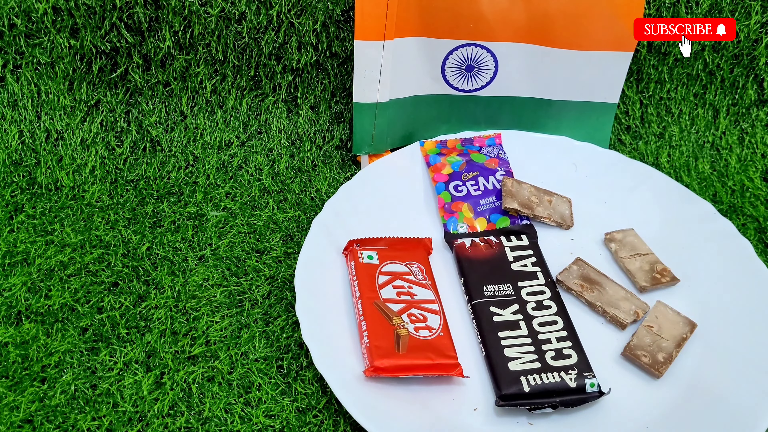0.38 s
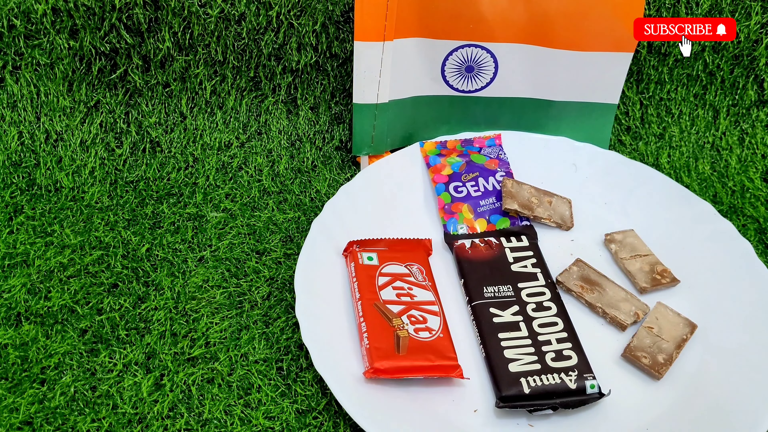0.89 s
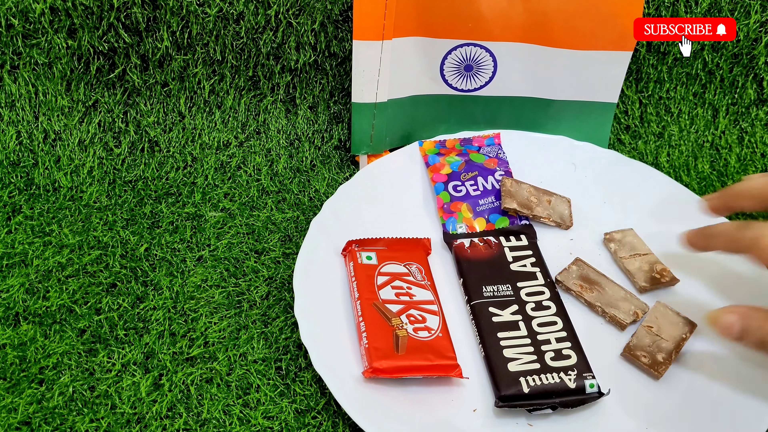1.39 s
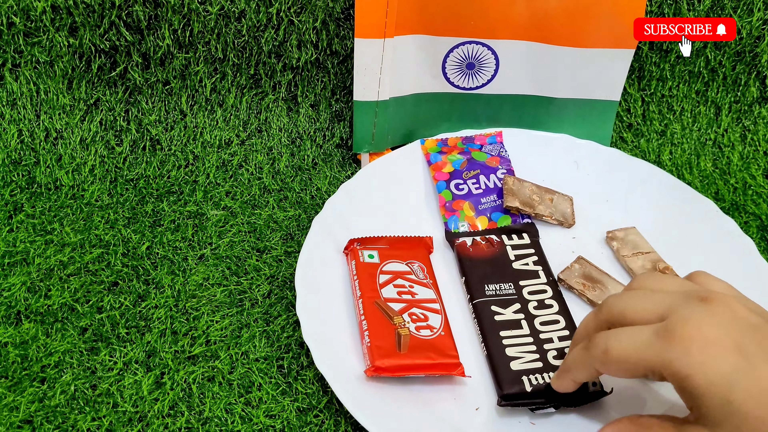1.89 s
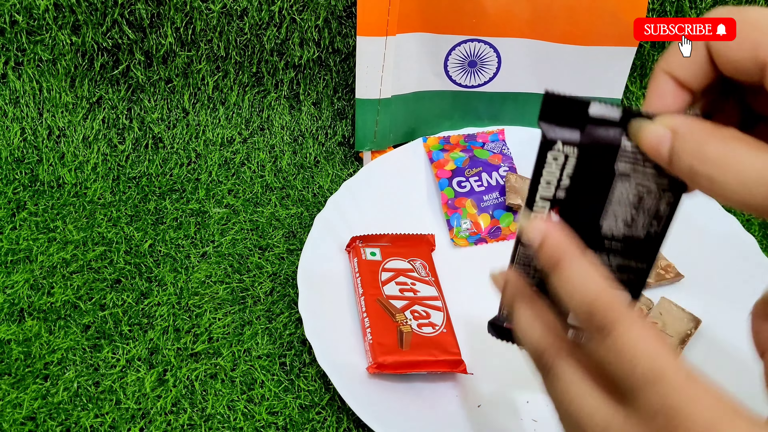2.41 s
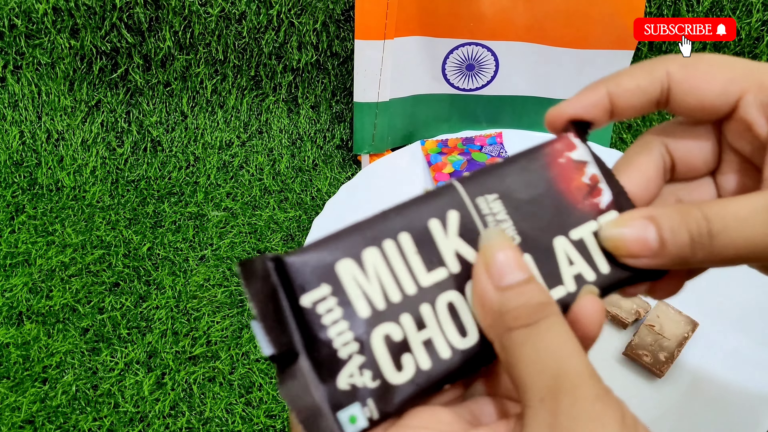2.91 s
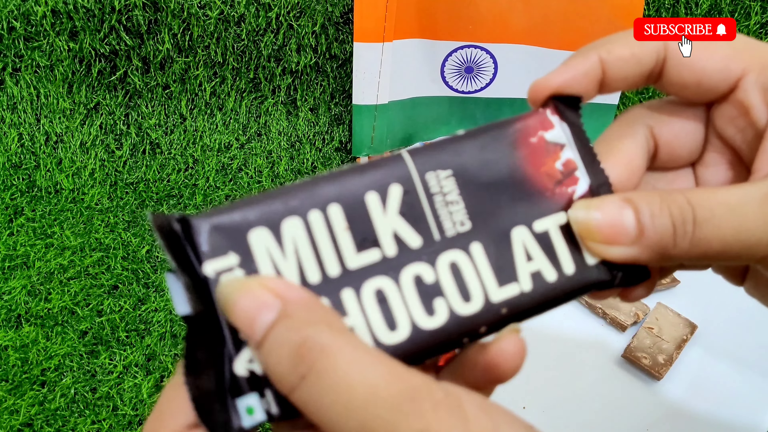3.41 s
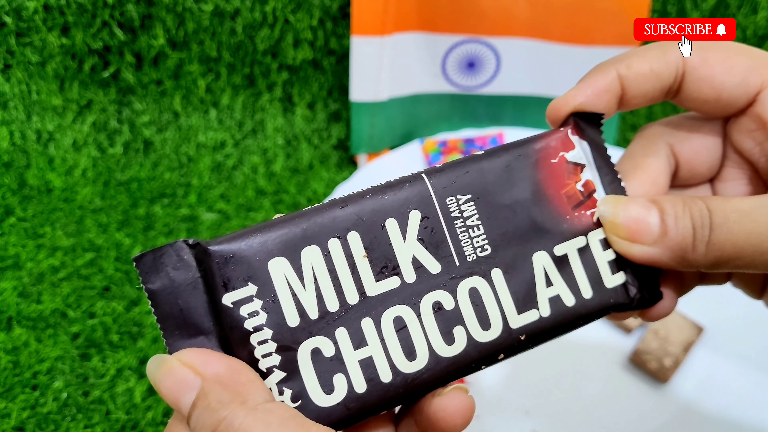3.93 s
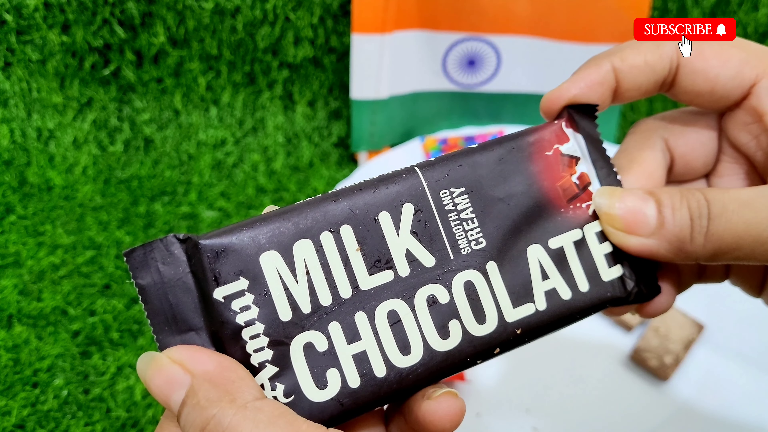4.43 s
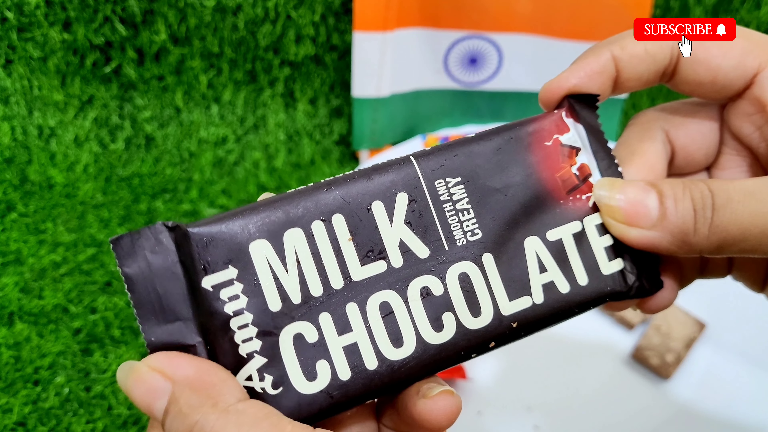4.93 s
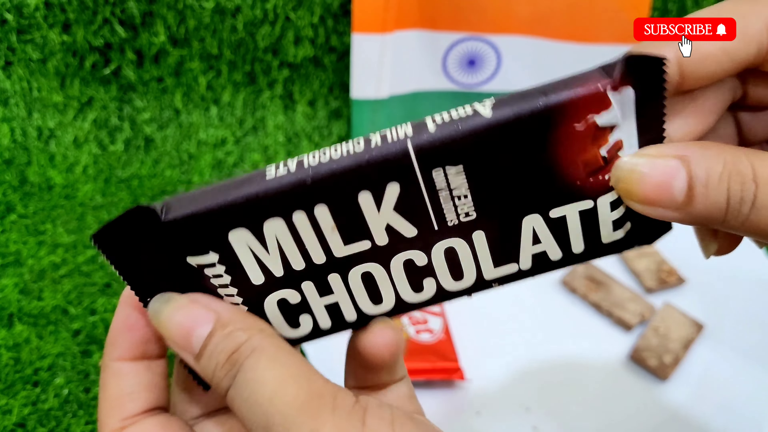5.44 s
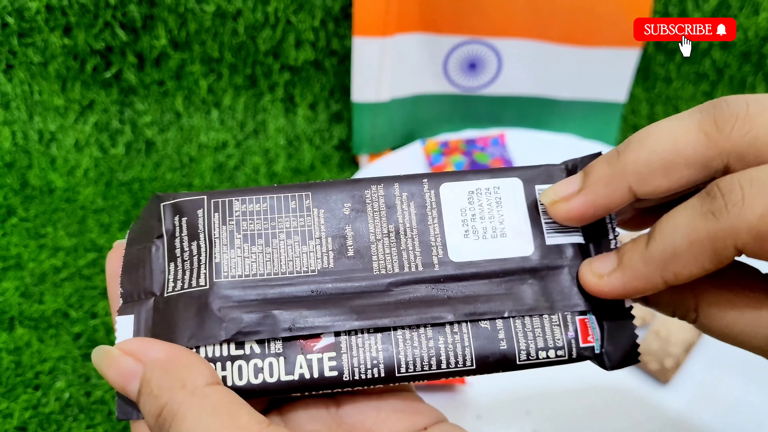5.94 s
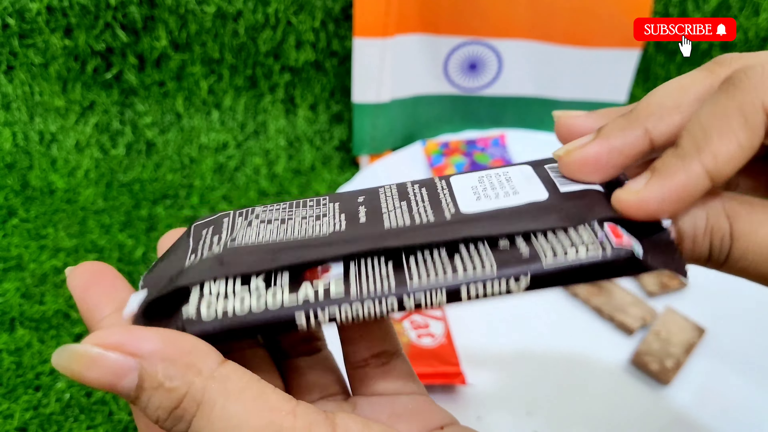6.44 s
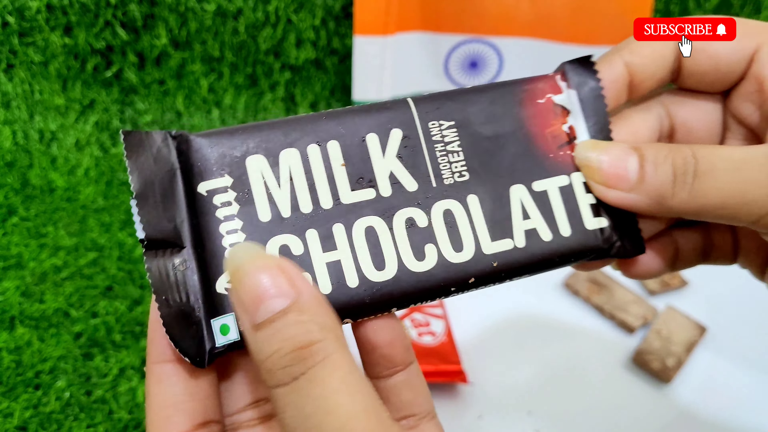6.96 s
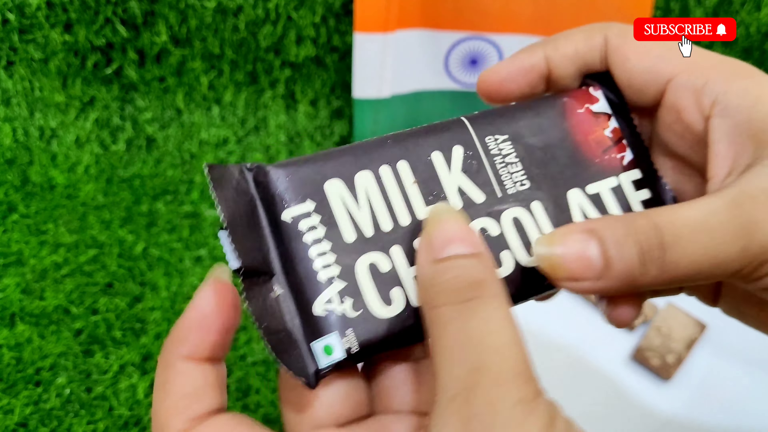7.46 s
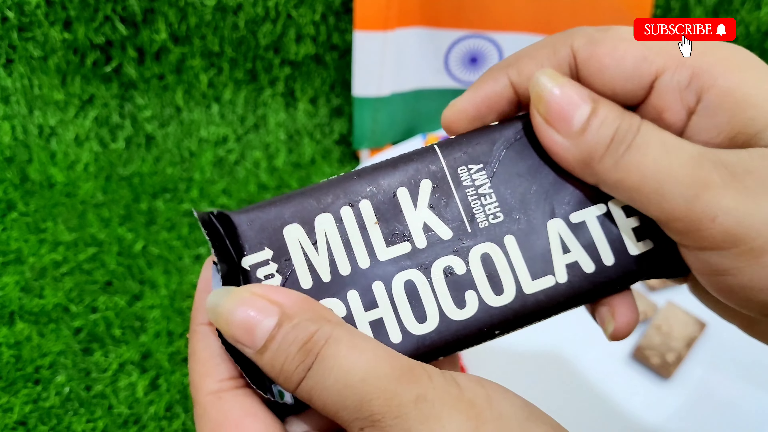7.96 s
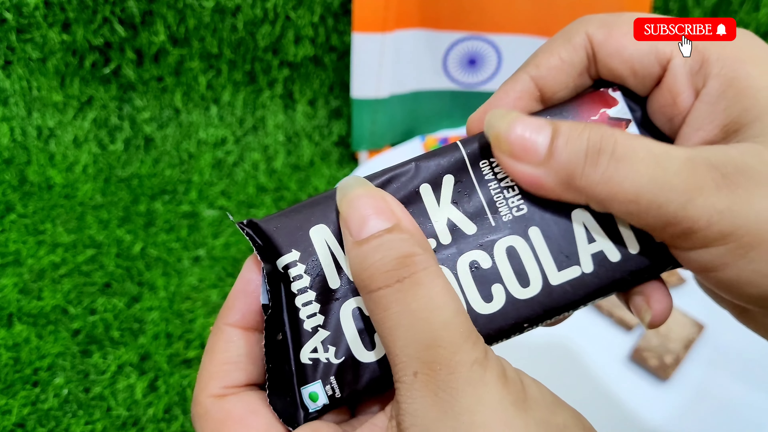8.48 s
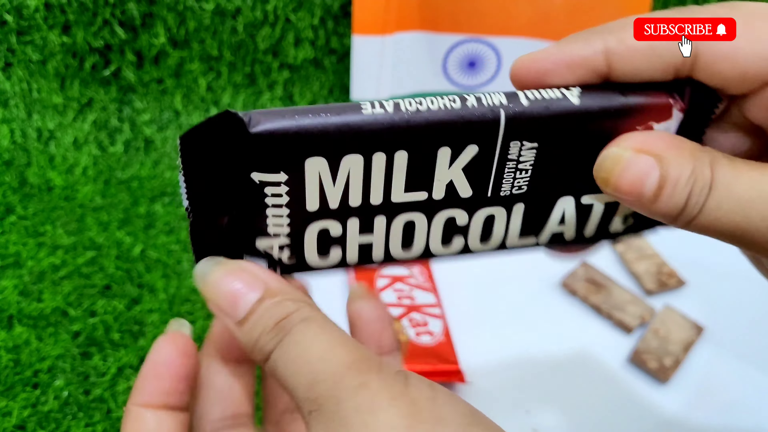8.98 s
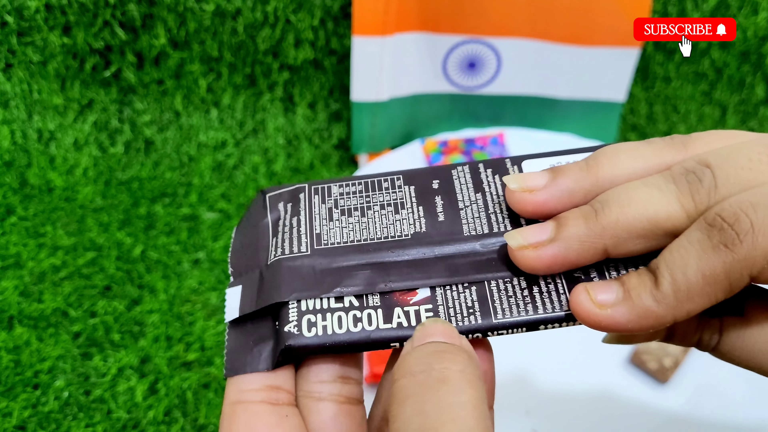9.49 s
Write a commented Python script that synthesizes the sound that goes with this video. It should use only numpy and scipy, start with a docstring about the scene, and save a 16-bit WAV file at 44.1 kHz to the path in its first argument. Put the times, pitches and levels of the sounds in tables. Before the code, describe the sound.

Close stereo pickup in a small room, with a faint uneven low rumble, soft hum, barely audible thin tone and hiss throughout. At 0 s a tight cluster of loud, bright film crackles bursts out, weakening by 0.7 s into duller crinkles. From about 1.1 to 1.8 s it is nearly silent. Around 1.8 s fingers touch the wrapper, and from 2.1 to 4 s crisp snaps and fine rustling come in quick irregular flurries, with a strong snap near 3.5 s. About 4.2 to 5 s is quiet apart from a soft bump near 4.9 s. A sharp crack at 5.4 s starts lighter, scattered crinkles, with clearer snaps at 6.3, 6.7 and 7 s. From 7.4 to 8.9 s squeezing becomes dense and forceful, peaking near 8.4 and 8.85 s, then thins to sparse crackles and a dull knock around 9.1 s, ending near 9.6 s.

```python
"""Chocolate bar in a crackling wrapper

Hands lift and turn a chocolate bar in its plastic wrapper, close to a two-port microphone in a small room.
Creases in the film snap over: each is shaped noise with a short ring, a treble crack and a low pop.
Tiny noise ticks and a steady noise rub fill the gaps, louder each time the fingers squeeze.
Below lie a rumble that swells and sinks, a hum, a faint tone and hiss, and a few soft bumps from the hands."""
import sys
import numpy as np
from scipy import signal
from scipy.io import wavfile
from scipy.ndimage import uniform_filter1d

SR = 44100
rng = np.random.default_rng(int(sys.argv[2]) if len(sys.argv) > 2 else 0)


def wav_record(signal):
    """Record a signal, one row per channel, as 16-bit PCM in the file named by sys.argv[1]."""
    frames = np.transpose(np.atleast_2d(signal))
    bounded = np.clip(frames, -1, 1)
    # unit amplitude maps onto the largest positive 16-bit level
    quanta = np.round(bounded * 32767).astype(np.int16)
    wavfile.write(sys.argv[1], SR, quanta)


def makeup_ratio(level_db):
    """Linear amplitude ratio for a level in decibels (20 dB per factor of ten)."""
    decades = np.asarray(level_db, float) / 20
    return 10 ** decades


N = 423801  # length in samples


def evened(x):
    """Scales to rms 1."""
    return x / np.sqrt(np.mean(x ** 2) + 1e-20)


def peaked(x):
    """Scales every row to peak 1."""
    return x / abs(x).max(-1, keepdims=True)


def read(points, hz):
    """Reads a table of (pitch, value) at any pitch, on a log-frequency axis."""
    f, value = np.transpose(points)
    return np.interp(np.log(hz + 1), np.log(f + 1), value)


def curve(rows):
    """Joins (time, value) points by straight lines, one value per sample."""
    time_s, value = np.transpose(rows)
    return np.interp(np.arange(N) / SR, time_s, value)


def add(mix, start_s, sound):
    """Mixes a two-port sound in at start_s, trimming what falls outside."""
    start = round(start_s * SR)
    sound = sound[:, max(-start, 0):]
    part = mix[:, max(start, 0):][:, :sound.shape[1]]
    part += sound[:, :part.shape[1]]


def band(x, lo_hz, hi_hz):
    """Band-pass filter that only looks back in time."""
    sos = signal.butter(2, [lo_hz, min(hi_hz, .49 * SR)], "band", fs=SR, output="sos")
    return signal.sosfilt(sos, x)


def colour(x, db_points, share=1):
    """Minimum-phase filter with the given spectrum, its dB values multiplied by share."""
    hz = abs(np.fft.fftfreq(2048, 1 / SR))
    log_gain = share * np.log(makeup_ratio(np.maximum(read(db_points, hz), -100)))
    taps = np.fft.ifft(np.exp(log_gain - 1j * signal.hilbert(log_gain).imag)).real
    return signal.oaconvolve(x, taps[:1024])[:N]


def noise(spectrum, size, patchy_db):
    """Two-port noise from random short-time spectra, with patches of time and pitch that differ in level."""
    # how alike the two ports are: pitch_hz, likeness (1 = the same)
    port_likeness = [(60, 0.95), (500, 0.86), (1500, 0.048), (15000, 0.17)]
    frames, hz = 4 * N // size + 5, np.fft.rfftfreq(size, 1 / SR)
    a, b, c, d, patches = rng.standard_normal((frames, len(hz), 5)).T
    patches = uniform_filter1d(patches, size=8, axis=0)
    patches = evened(uniform_filter1d(patches, size=6, axis=1))
    same = np.clip(read(port_likeness, hz), -1, 1)[:, None]
    left = a + 1j * b
    right = same * left + np.sqrt(1 - same ** 2) * (c + 1j * d)
    z = np.array([left, right])
    z *= makeup_ratio(read(spectrum, hz)[:, None] + patchy_db * patches)
    return evened(signal.istft(z, nperseg=size, noverlap=3 * size // 4)[1][:, :N])


def fading(t, t60, rise):
    """Quick rise, then an exponential fall of 60 dB in t60 seconds."""
    return (1 - np.exp(-t / rise)) * makeup_ratio(-60 * t / t60)


def handling():
    """How hard the film is worked, in dB: every squeeze grips fast, holds and lets go more slowly."""
    # squeezes of the fingers: start_s, rustle_db, hold_s
    squeezes = [(0, -31.5, 0.14), (.24, -53.5, 0.097), (0.44, -35, 0.017), (0.545, -44, 0.15),
                (0.748, -59, 0.083), (0.926, -46.5, 0.04), (1.059, -67, 0.13), (1.25, -74, 0.14),
                (1.663, -72, 0.04), (1.753, -67.5, 0.056), (1.821, -51.5, 0.031), (2.001, -70, 0.053),
                (2.138, -50.5, 0.31), (2.245, -37, 0.021), (2.505, -38, 0.029), (2.597, -35.5, 0.0082),
                (2.804, -37.5, 0.0057), (2.923, -42.5, 0.0052), (3.146, -45.5, 0.028), (3.28, -55.5, 0.3),
                (3.685, -52.5, 0.081), (3.871, -47, 0.0083), (4.994, -71.5, 0.15), (5.169, -48.5, 0.0083),
                (5.405, -47, 0.056), (5.599, -53, 0.1), (5.797, -41.5, 0.0046), (5.891, -50.5, .015),
                (6.27, -58.5, 0.2), (6.407, -60.5, 0.12), (6.637, -64.5, 0.17), (6.839, -52, 0.0062),
                (6.984, -40, 0.01), (7.378, -54.5, 0.11), (7.499, -37.5, 0.065), (7.64, -42.5, 0.0053),
                (7.746, -40.5, 0.039), (7.934, -43, 0.24), (8.289, -46, 0.1), (8.371, -44.5, 0.1),
                (8.533, -53, 0.61), (8.835, -29.5, 0.019), (8.966, -60.5, 0.17), (9.14, -46.5, 0.075),
                (9.369, -54, 0.022), (9.443, -48, 0.018)]
    grip_db_per_s, release_db_per_s, rest_db = 1090, 201, -88.5
    t = np.arange(0, N / SR + .002, .002)
    start_s, rustle_db, hold_s = np.transpose(squeezes)[..., None]
    before_s = np.maximum(start_s - t, 0)
    after_s = np.maximum(t - start_s - hold_s, 0)
    each_db = rustle_db - grip_db_per_s * before_s - release_db_per_s * after_s
    total_db = 10 * np.log10((makeup_ratio(each_db) ** 2).sum(0) + makeup_ratio(rest_db) ** 2)
    return np.interp(np.arange(N) / SR, t, total_db)


def background():
    """Swelling rumble noise, a hum of noise that grows with handling, a wavering sine tone and hiss."""
    # swells of the rumble: time_s, level_db
    rumble_swells = [(0.0, -52), (0.72, -63), (0.77, -51), (1.2, -75.5), (1.84, -57.5), (1.92, -69.5),
                     (2.27, -51.5), (2.99, -68), (3.05, -52), (4.36, -66), (4.52, -48.5), (4.65, -60),
                     (4.78, -48), (5.03, -68), (5.32, -52.5), (6.82, -68), (6.98, -47.5), (7.03, -61.5),
                     (8.37, -61), (8.53, -50), (8.69, -55.5), (9.12, -50), (9.52, -60.5), (9.6, -52)]
    # tone of each noise, before its level is set: pitch_hz, relative level_db (per Hz)
    rumble_tone = [(20, -35), (35, -27), (50, -6.5), (63, 11.5), (75, -1), (115, 4.5), (140, -5.5),
                   (200, -67)]
    hum_tone = [(100, -14.5), (160, -10), (380, -8), (440, -16.5), (700, -22.5), (1200, -36.5),
                (1800, -68.5)]
    hiss_tone = [(500, -41.5), (1000, -1), (2500, -7), (5800, -18.5), (16000, -11)]
    width = round(.1 * SR)  # chance swells are smoothed twice over 0.1 s
    lumps = uniform_filter1d(rng.standard_normal(N), width)
    lumps = evened(uniform_filter1d(lumps, width))
    rumble = makeup_ratio(curve(rumble_swells)) * noise(rumble_tone, size=2048, patchy_db=-2.0)
    stir_db = 0.18 * (uniform_filter1d(handling(), size=8000) + 70)
    hum_db = -64.5 + stir_db + 2.5 * lumps
    hum = makeup_ratio(hum_db) * noise(hum_tone, size=2048, patchy_db=2.8)
    whine_db = -84.5 + 4 * lumps[::-1]
    whine = makeup_ratio(whine_db) * np.sin(2 * np.pi * 571 * np.arange(N) / SR)
    hiss = makeup_ratio(-80) * noise(hiss_tone, size=1024, patchy_db=3.0)
    return rumble + hum + whine + hiss


def bumps():
    """Dull knocks of the hands: a short puff of noise around a low pitch."""
    # soft bumps: start_s, peak_db, pitch_hz, t60_s (time to fall 60 dB), rise_s
    knocks = [(0.42, -45, 370, 0.57, 0.041), (0.949, -49, 253, 0.023, 0.0057),
              (4.878, -45.5, 279, 0.34, 0.031), (4.889, -43.5, 490, 0.23, 0.027),
              (5.323, -39, 332, 0.09, 0.0015), (7.0, -46.5, 374, 0.1, 0.023),
              (3.48, -38.5, 730, 0.06, 0.0016), (9.131, -40, 340, 0.089, .003)]
    out, t = np.zeros((2, N)), np.arange(8000) / SR  # longer fades are cut off here
    for start_s, peak_db, hz, t60_s, rise_s in knocks:
        shake = rng.standard_normal(len(t)) + 0.51 * rng.standard_normal((2, len(t)))
        puff = band(shake, hz / 2, hz * 2) * fading(t, t60_s, rise_s)
        add(out, start_s, makeup_ratio(peak_db) * peaked(band(puff, hz / 1.135, hz * 1.18)))
    return out


def room(x):
    """Echo from three tails of sparse random taps, each pitch band dying at its own speed."""
    # how long the echo lasts: pitch_hz, t60_s (time to fall 60 dB)
    echo_times = [(500, 0.55), (1320, 0.29), (3480, 0.37), (9190, 0.23)]
    taps = np.zeros((3, 2, SR // 2))
    starts = np.arange(400, SR // 2 - 10, 10)  # the first echo comes after 400 samples
    at = starts + rng.integers(0, 10, (3, 2, len(starts)))
    np.put_along_axis(taps, at, rng.choice([-1., 1.], at.shape), 2)
    hz, t, z = signal.stft(taps, SR, nperseg=128)
    fade = makeup_ratio(-60 * t / read(echo_times, hz)[:, None])
    tails = signal.istft(z * fade, SR, nperseg=128)[1]
    # the sound fed to each tail swings 7.3 times a second, each tail at its own phase
    turn = 2 * np.pi * 7.3 * np.arange(N) / SR + np.arange(3)[:, None] * np.pi / 3
    fed = x.mean(0) * np.cos(turn) * np.sqrt(2 / 3)
    tails = tails / np.linalg.norm(tails[0, 0])
    return signal.fftconvolve(fed[:, None], tails, axes=2).sum(0)[:, :N]


def rustle():
    """Many tiny creases, each ringing in one of 16 pitch bands, over the rub of skin on film."""
    # tone of the rustling film: pitch_hz, relative level_db (per Hz)
    film_tone = [(300, -36), (500, -3.5), (1000, -7), (1400, -4.5), (2100, 0.5), (3000, -0.5), (5500, 5.5),
                 (9300, -5), (15000, -4.5), (16500, -27.5)]
    # part of the film worked, dull folds below 0, tight bright creases above: time_s, treble_minus_body_db
    tightness = [(0, 1), (.6, -8), (1.0, -8.5), (1.55, -1.5), (1.65, -24), (1.73, -12), (1.76, -0.5),
                 (3.5, -2.5), (5.05, 3.5), (5.5, -2), (6.4, -5), (7.5, -1), (9.61, -3.5)]
    size_db = 5 * np.minimum(rng.exponential(1, N), 2.6)
    size = makeup_ratio(size_db) * (rng.random(N) < 650 / SR)  # about 650 ticks a second
    patch, t, ticks = rng.integers(0, 16, N), np.arange(400) / SR, np.zeros((2, N))
    for k, hz in enumerate(np.geomspace(1500, 12000, num=16)):
        shake = rng.standard_normal((2, len(t))) * fading(t, .009, .0003)
        tick = evened(band(shake, hz / 1.35, hz * 1.35))
        tick = tick * makeup_ratio(read(film_tone, hz)) * np.sqrt(hz)  # wider bands hold more power
        ticks += signal.oaconvolve((size * (patch == k))[None], tick, axes=1)[:, :N]
    effort_db = handling()
    share = np.clip(.42 + .006 * (effort_db + 50), 0, 1)  # harder handling crackles more, light touch rubs
    rub = noise(film_tone, size=256, patchy_db=4)
    film = makeup_ratio(effort_db) * (np.sqrt(share) * evened(ticks) + np.sqrt(1 - share) * rub)
    body = signal.lfilter(*signal.butter(2, 3500, fs=SR), film)
    treble = film - body
    lean = makeup_ratio(curve(tightness) / 2)
    return body / lean + treble * lean


def snaps():
    """Each crease rings its patch of film for a few cycles, cracks in the treble and pops the air pocket."""
    # creases snapping over; offsets below shift the levels:
    # start_s, ring level_db, ring pitch_hz, treble crack level_db, low pop level_db
    crease_snaps = [(0.002, -14.5, 4400, -19.5, -24), (0.0207, -14.5, 3750, -20.5, -48),
                    (0.0567, -8, 3740, -26, -25), (0.064, -18, 3900, -37, -56.5),
                    (0.0764, -10, 5370, -20, -26), (0.0994, -10, 6100, -22, -54),
                    (0.1335, -23, 7160, -23, -56), (0.2999, -22, 6420, -23, -47),
                    (0.4174, -27, 3270, -38, -61), (0.4412, -28, 2710, -44, -50),
                    (0.4467, -27.5, 2540, -42, -45), (0.4655, -27, 7570, -38, -42),
                    (0.529, -28.5, 2772, -37.5, -64), (0.5685, -33.5, 2600, -37, -32),
                    (0.5823, -37.5, 2250, -29.5, -34), (0.6572, -28, 3385, -48, -59),
                    (0.67, -31, 3300, -53.5, -68), (0.9132, -34.5, 2830, -50.5, -42),
                    (0.9585, -52, 2240, -51, -38), (1.0711, -48.5, 4900, -63, -70),
                    (1.1184, -54.5, 2270, -75, -59), (1.6552, -67.5, 2200, -81, -49),
                    (1.8324, -30, 4940, -43.5, -54), (1.8611, -33.5, 4300, -48.5, -43),
                    (2.104, -46, 5200, -57.5, -77), (2.1175, -24, 4560, -44.5, -77),
                    (2.149, -23.5, 4840, -35, -70.5), (2.2384, -23, 4530, -44, -58),
                    (2.2561, -27, 4970, -41, -36.5), (2.292, -31.5, 4970, -42.5, -58),
                    (2.3398, -23, 7434, -34.5, -37), (2.3602, -20, 5100, -31, -33.5),
                    (2.3875, -24, 3608, -30, -48), (2.497, -23, 4528, -35, -52),
                    (2.5056, -18, 3285, -21, -56), (2.5149, -23.5, 4180, -43, -41),
                    (2.559, -28.5, 2580, -49, -53), (2.598, -18, 5644, -28, -30.5),
                    (2.6044, -22.5, 5000, -41, -25), (2.6356, -17, 4216, -36, -46),
                    (2.669, -21, 5480, -36, -26.5), (2.7851, -21.5, 2240, -27.5, -35),
                    (2.7965, -27.5, 2270, -43, -29), (2.9293, -29.5, 4760, -49, -34),
                    (3.017, -24, 6790, -36, -38), (3.081, -25, 5100, -39.5, -38),
                    (3.0911, -32, 2390, -50, -47), (3.147, -18.5, 6696, -37, -57),
                    (3.1551, -24, 4800, -51, -36), (3.1825, -31, 4720, -49.5, -34),
                    (3.2648, -19.5, 5900, -30.5, -34.5), (3.3482, -21.5, 6160, -40, -60),
                    (3.4169, -29, 6300, -41, -56), (3.481, -14, 5940, -27, -26),
                    (3.5228, -24, 5840, -48, -34), (3.6436, -25, 5010, -38, -48),
                    (3.6593, -22, 5630, -32, -32), (3.7174, -29.5, 4700, -66, -84),
                    (3.7387, -23, 4910, -40.5, -70), (3.7619, -29.5, 3240, -38, -65),
                    (3.816, -30.5, 5340, -60, -48), (3.8689, -17.5, 5010, -28, -32.5),
                    (3.9404, -29.5, 4150, -40.5, -72.5), (3.997, -29.5, 5943, -44, -80),
                    (4.2078, -36.5, 5100, -59, -91), (5.069, -49.5, 5800, -64, -83),
                    (5.1666, -23.5, 4490, -47.5, -41), (5.172, -27, 5120, -38, -48),
                    (5.3042, -44, 5700, -71, -63), (5.3278, -37, 5640, -70.5, -40),
                    (5.4258, -9, 6890, -30, -58.5), (5.4367, -28.5, 6070, -52, -36),
                    (5.6209, -37, 4750, -60, -45), (5.659, -26, 2784, -51.5, -40),
                    (5.7449, -25.5, 6100, -46, -45), (5.778, -37.5, 2170, -53, -42),
                    (5.8075, -23.5, 5810, -35, -65), (5.8156, -22.5, 5930, -31, -31),
                    (5.8297, -33.5, 3300, -48.5, -57), (5.891, -32.5, 5770, -48, -53),
                    (5.9431, -27.5, 5100, -49, -41.5), (6.0459, -35, 4300, -73, -48),
                    (6.1079, -38.5, 4750, -50, -58), (6.2376, -34.5, 4523, -50.5, -48),
                    (6.2485, -34, 5720, -57, -47), (6.2856, -16, 3800, -38, -43),
                    (6.352, -34.5, 2920, -67, -43), (6.3943, -37.5, 3500, -69, -69),
                    (6.437, -42, 5400, -63, -70), (6.4602, -43.5, 2250, -72, -41),
                    (6.6062, -43.5, 4840, -74, -80.5), (6.6753, -42, 4360, -66, -68),
                    (6.7038, -19, 5300, -30, -30.5), (6.8516, -38.5, 3370, -36.5, -42),
                    (6.9231, -29, 4930, -40.5, -46), (6.9295, -21, 5480, -33, -69),
                    (6.9836, -15.5, 4600, -32, -48), (7.0055, -29.5, 5096, -41.5, -38),
                    (7.011, -23, 7460, -31.5, -57), (7.037, -29, 5110, -37.5, -37),
                    (7.443, -20, 5444, -34.5, -30), (7.4671, -27.5, 4646, -27.5, -29),
                    (7.5051, -24, 5910, -41.5, -28), (7.5138, -24.5, 5385, -47.5, -65),
                    (7.5331, -13.5, 3803, -21, -20), (7.638, -33.5, 3440, -56.5, -46),
                    (7.649, -30, 6070, -42, -36), (7.7065, -26, 5540, -32.5, -41),
                    (7.7157, -27.5, 2772, -24.5, -66), (7.728, -31.5, 5410, -45, -44),
                    (7.7402, -23.5, 5490, -35, -42), (7.7501, -24, 4374, -28.5, -30.5),
                    (7.7638, -25, 5580, -43, -60), (7.796, -34.5, 4820, -47, -55),
                    (7.8172, -23.5, 2910, -34.5, -52), (7.8213, -29.5, 4500, -35.5, -40),
                    (7.8531, -16, 3045, -24, -40), (7.8601, -20, 3670, -37, -42),
                    (7.879, -22, 4590, -42, -39), (7.8885, -27.5, 3326, -45, -38),
                    (7.9345, -19.5, 5590, -36.5, -32), (7.9511, -17, 3130, -20, -42),
                    (7.964, -18.5, 2868, -32.5, -67), (7.9858, -16.5, 6326, -25.5, -36),
                    (8.0435, -28.5, 4480, -47.5, -53), (8.078, -14.5, 3140, -25.5, -69),
                    (8.107, -21.5, 6220, -48.5, -33), (8.1247, -23.5, 5840, -41.5, -43),
                    (8.2619, -31, 2300, -60.5, -66), (8.2865, -29.5, 3120, -52, -59),
                    (8.3668, -14, 6840, -30, -27), (8.3848, -13.5, 2600, -32.5, -22),
                    (8.4265, -19.5, 2670, -34.5, -55), (8.4484, -25, 3192, -27, -61),
                    (8.4572, -21, 5790, -42, -57), (8.4815, -28.5, 5540, -38.5, -62),
                    (8.517, -22, 4673, -28, -38), (8.527, -23.5, 4930, -37, -36),
                    (8.6252, -29.5, 3876, -52, -40), (8.6933, -24, 7030, -38.5, -58),
                    (8.7171, -22.5, 2997, -25, -61), (8.73, -18, 6300, -27.5, -37.5),
                    (8.7509, -25.5, 4890, -37, -38), (8.804, -22.5, 4070, -43.5, -55),
                    (8.827, -19, 4482, -29, -52), (8.8437, -10.5, 4200, -22.5, -33),
                    (8.905, -19, 3490, -31.5, -27), (8.974, -35, 4985, -54, -34),
                    (9.0402, -25.5, 4285, -41.5, -64), (9.0865, -26.5, 4706, -40, -52),
                    (9.1323, -21.5, 5235, -31, -24.5), (9.2146, -27, 4000, -52, -28),
                    (9.406, -29.5, 5430, -66, -47), (9.4441, -30, 2310, -44.5, -72),
                    (9.457, -28.5, 3650, -53, -70)]
    out, lead = np.zeros((2, N)), .006  # seconds of strain before the snap
    t = np.arange(1280) / SR - lead
    after = np.maximum(t, 0)
    # the film strains before it gives, then settles
    creak = makeup_ratio(np.where(t < 0, 2300 * t - 21, -13 - 60 * t / .04))
    # the crease flips an instant after it starts to slip
    give = 4.5 * fading(np.maximum(t - .0008, 0), .0015, .00005)
    for start_s, ring_db, hz, crack_db, pop_db in crease_snaps:
        shake = rng.standard_normal((9, len(t)))
        ring = (shake[0] + 0.7 * shake[:2][::-1]) * (fading(after, 0.012, 0.0012) + give + creak / 2)
        ring = band(ring, hz / 1.134, hz * 1.132)
        wide = shake[2:4] * (fading(after, 0.032, 0.0007) + give + creak)
        wide = band(band(wide, hz / 2.1, 8100), hz / 2.6, 12000)
        crack = shake[4:6] * (fading(after, 0.0044, 0.00029) + give / 2 + creak)
        crack = band(crack, 9500, 15000)
        # long waves reach both ports alike
        pop = (shake[8] + 0.42 * shake[6:8]) * fading(after, 0.03, 0.00038)
        pop = band(band(pop, 420, 2900), 800, 3900)
        # a weak crack leaves a purer ring
        wide_gain = 2.5 * makeup_ratio(0.34 * (crack_db - ring_db))
        body = makeup_ratio(ring_db + 2.5) * peaked(peaked(ring) + wide_gain * peaked(wide))
        edges = makeup_ratio(crack_db + 9.5) * peaked(crack) + makeup_ratio(pop_db - 4.0) * peaked(pop)
        add(out, start_s - lead, body + edges)
    return out


def scene():
    """The film and its echo, the bumps and the background."""
    film = snaps() + rustle()
    return film + makeup_ratio(-12) * room(film) + bumps() + background()


def band_limit(x):
    """A steep low-pass at the top of the band."""
    return signal.sosfilt(signal.butter(12, 16800, fs=SR, output="sos"), x)


def record(dry):
    """Each microphone port has its own tone colour, half the difference going to each."""
    # difference between the ports: pitch_hz, left_minus_right_db
    port_tone = [(100, -.5), (1000, -1.5), (2700, 0.5), (4200, -1), (6400, -5), (7800, -8.5), (9000, 4),
                 (15000, 9)]
    left = colour(dry[0], port_tone, share=1 / 2)
    right = colour(dry[1], port_tone, share=-1 / 2)
    return band_limit(np.array([left, right]))


dry = scene()
out = record(dry)
wav_record(out)
```